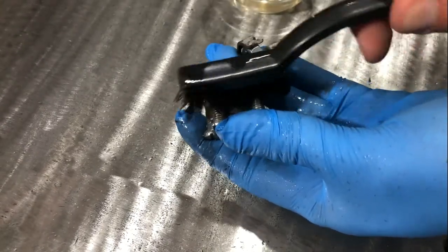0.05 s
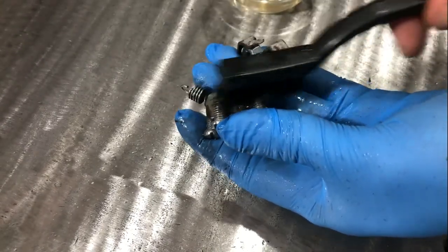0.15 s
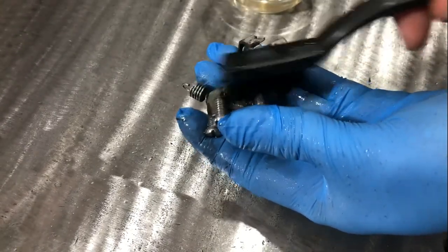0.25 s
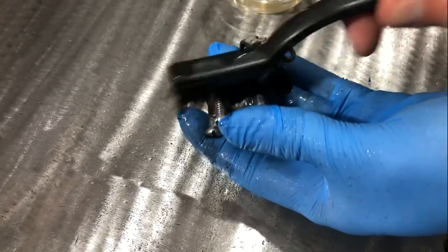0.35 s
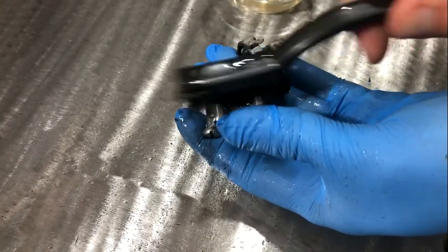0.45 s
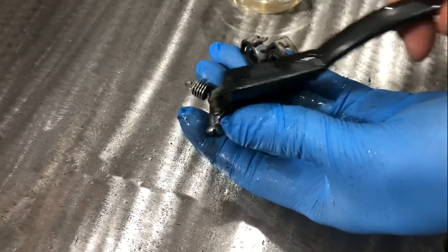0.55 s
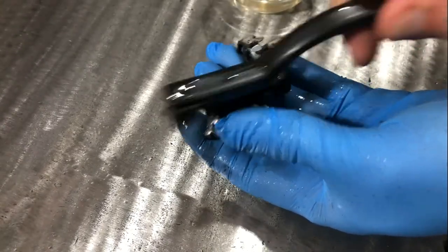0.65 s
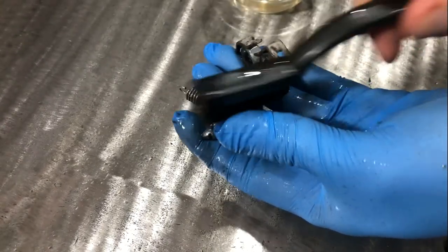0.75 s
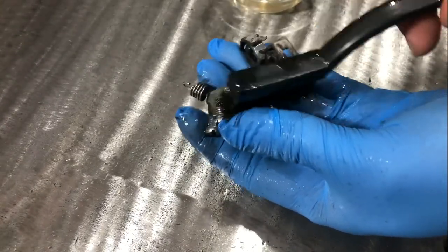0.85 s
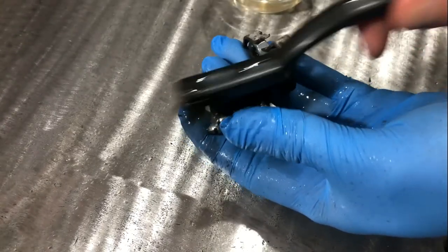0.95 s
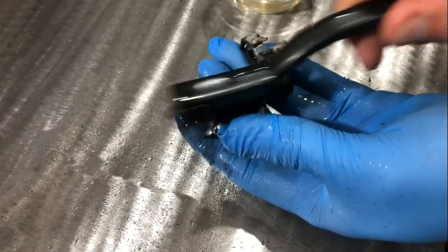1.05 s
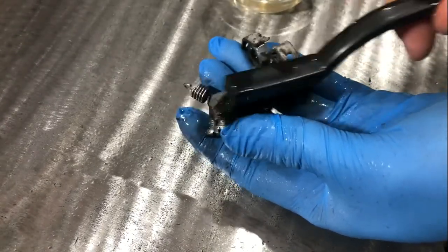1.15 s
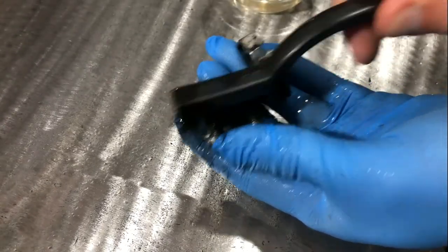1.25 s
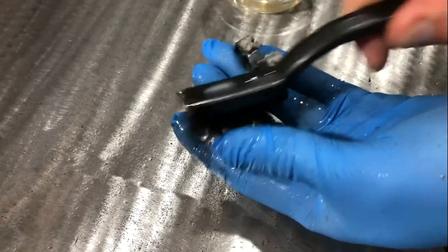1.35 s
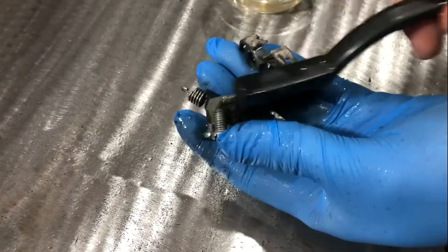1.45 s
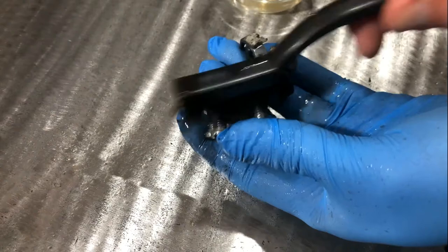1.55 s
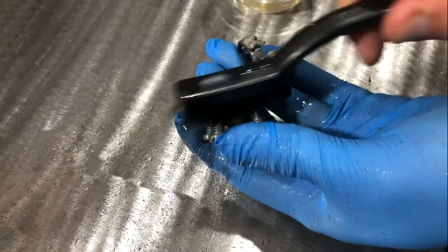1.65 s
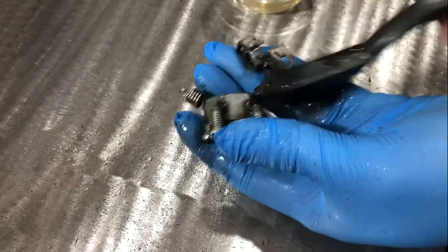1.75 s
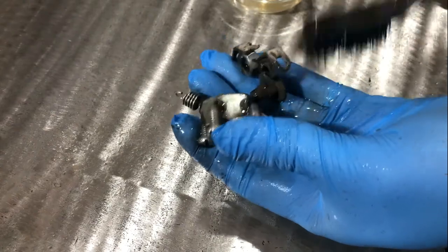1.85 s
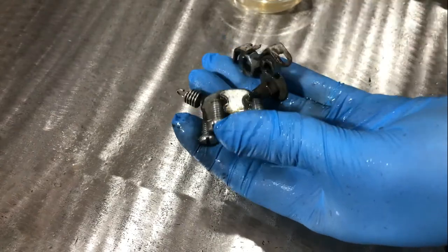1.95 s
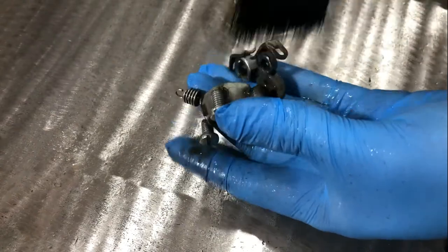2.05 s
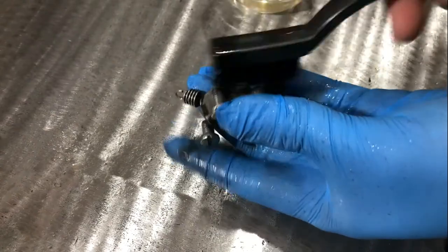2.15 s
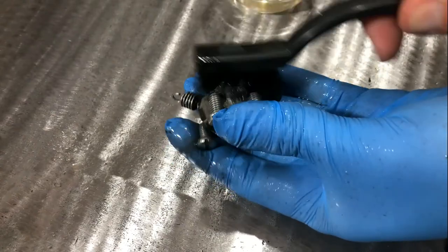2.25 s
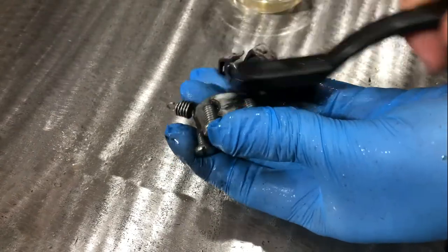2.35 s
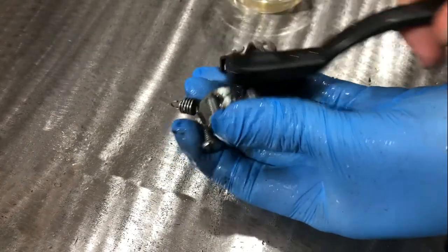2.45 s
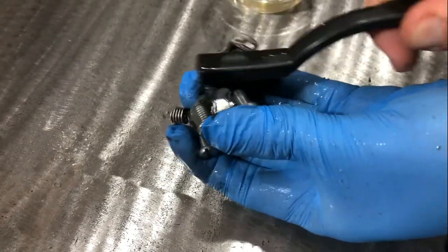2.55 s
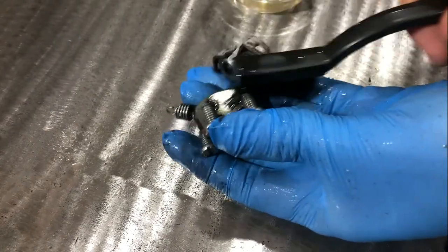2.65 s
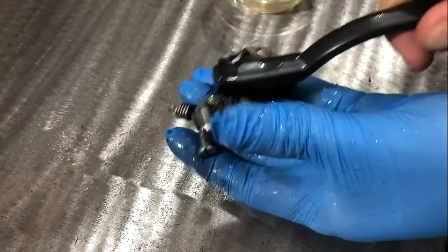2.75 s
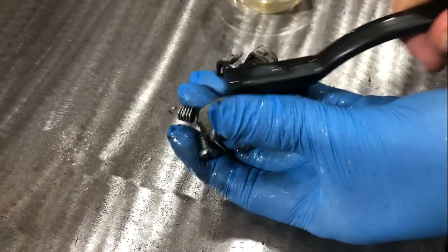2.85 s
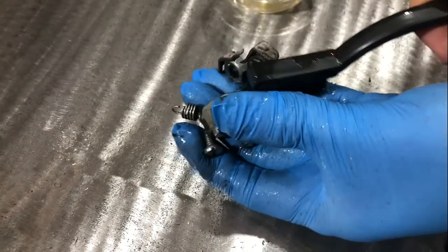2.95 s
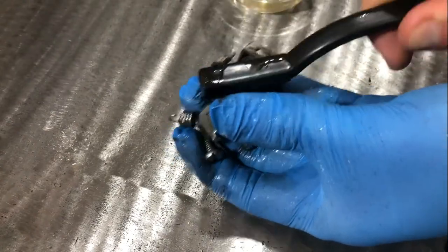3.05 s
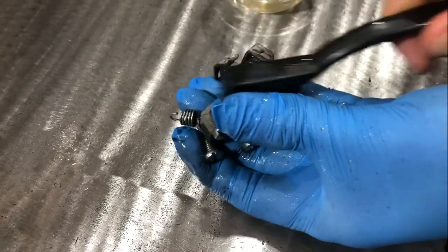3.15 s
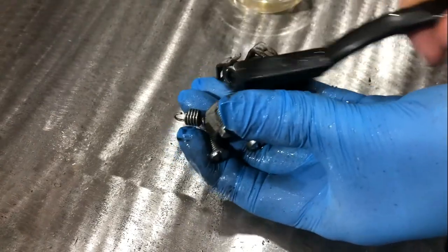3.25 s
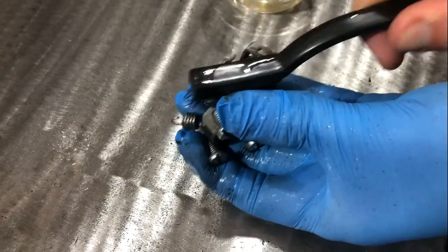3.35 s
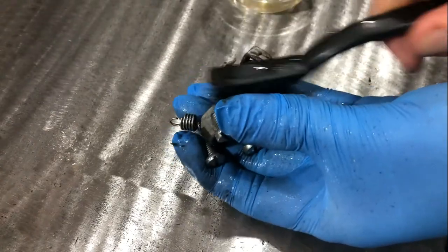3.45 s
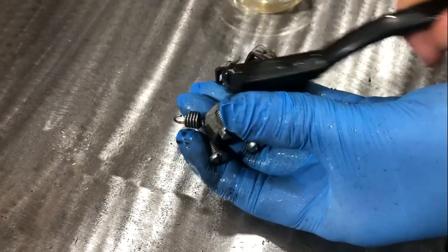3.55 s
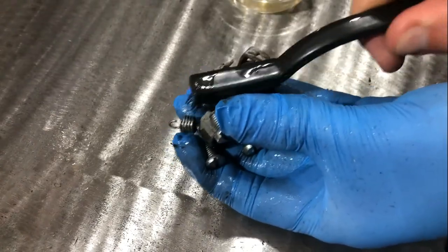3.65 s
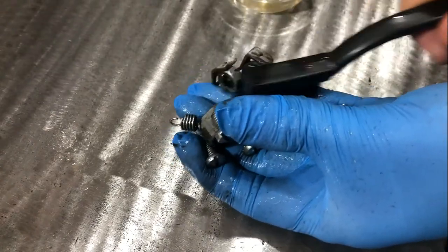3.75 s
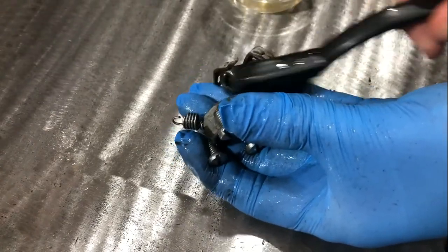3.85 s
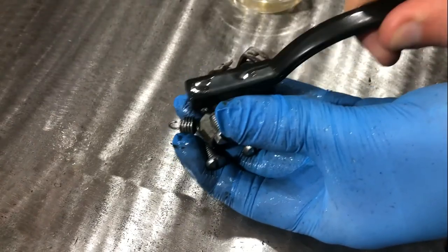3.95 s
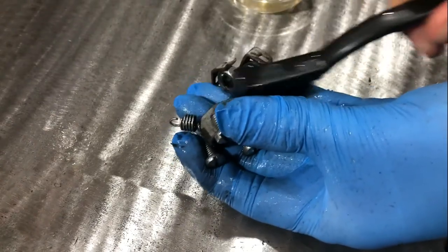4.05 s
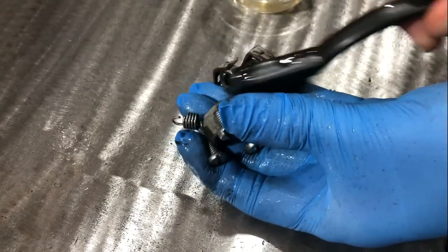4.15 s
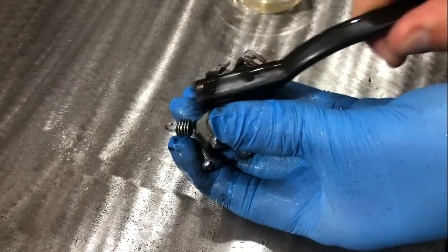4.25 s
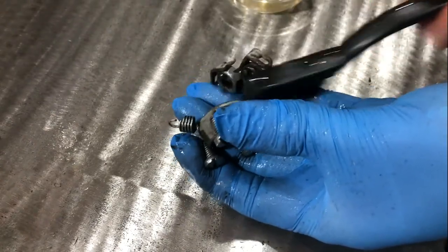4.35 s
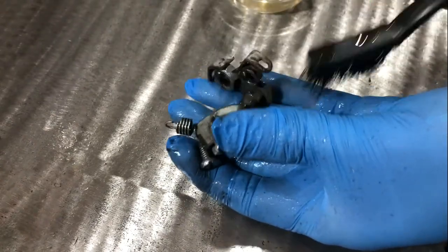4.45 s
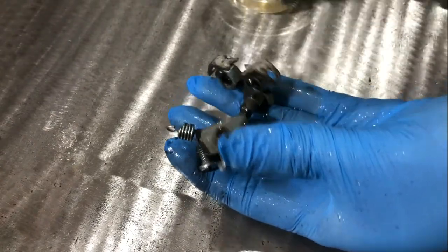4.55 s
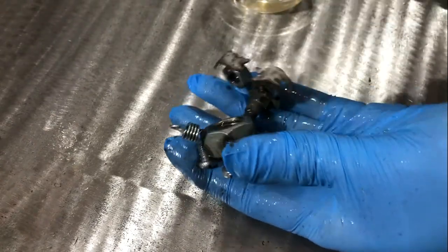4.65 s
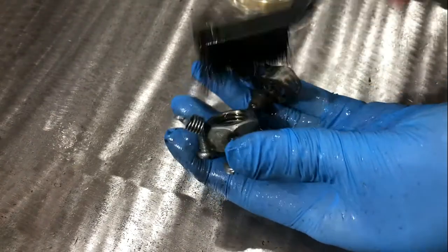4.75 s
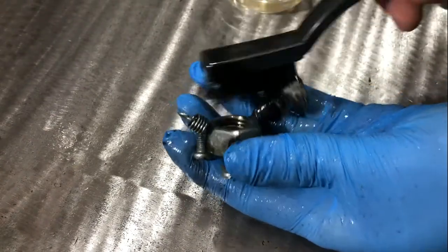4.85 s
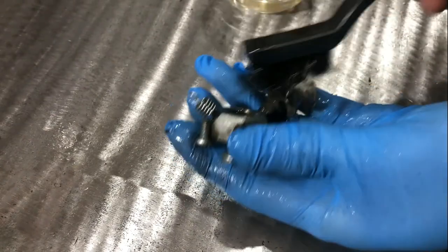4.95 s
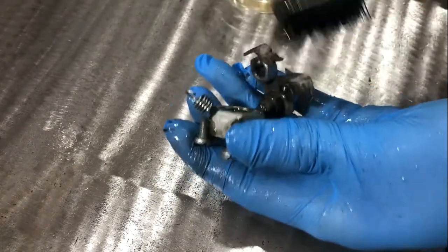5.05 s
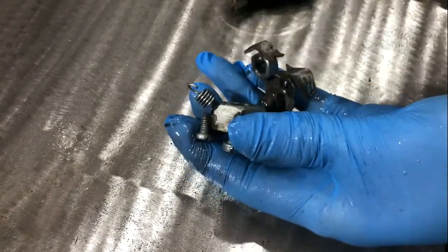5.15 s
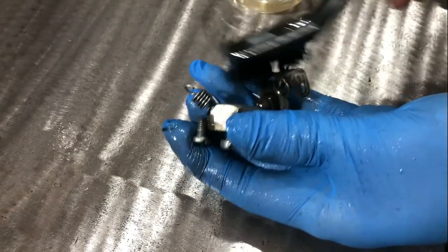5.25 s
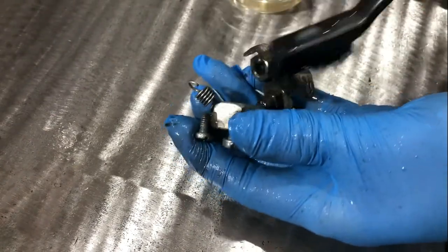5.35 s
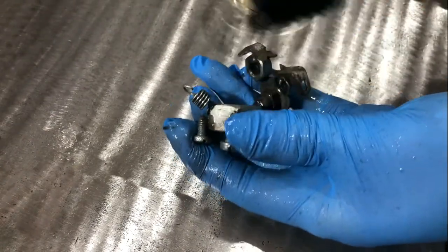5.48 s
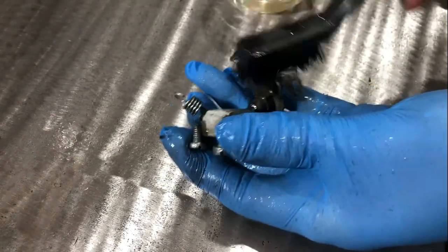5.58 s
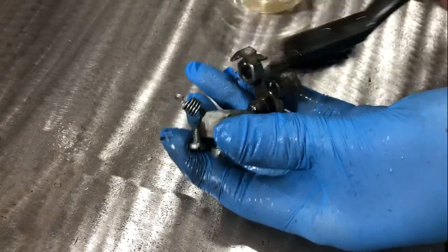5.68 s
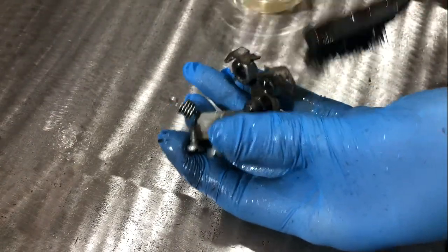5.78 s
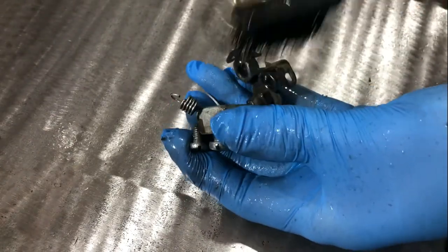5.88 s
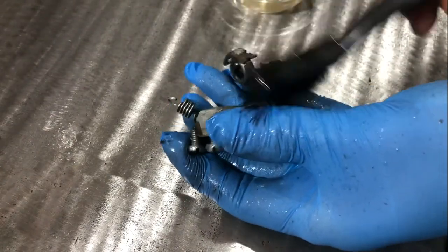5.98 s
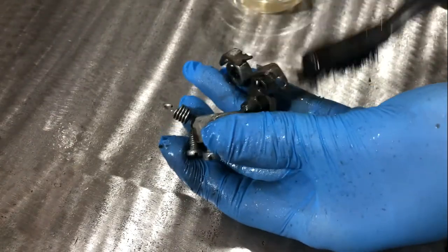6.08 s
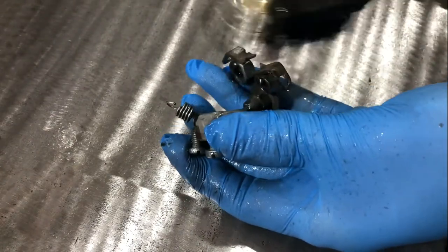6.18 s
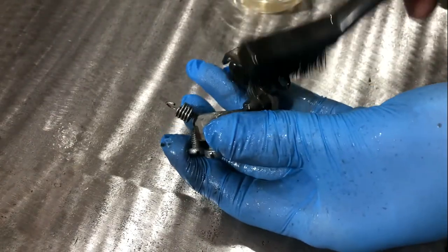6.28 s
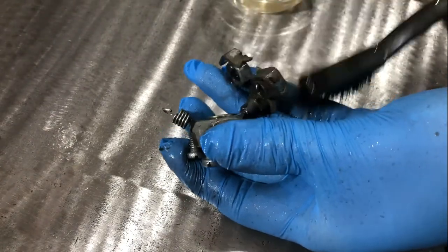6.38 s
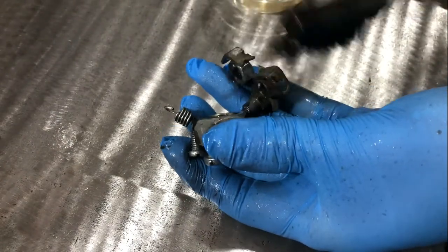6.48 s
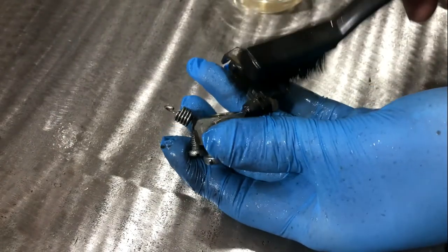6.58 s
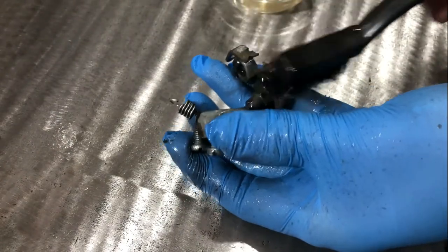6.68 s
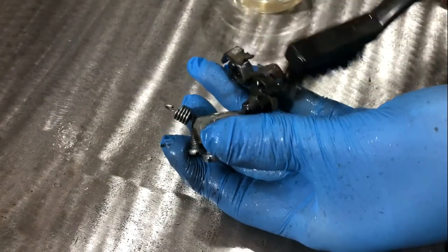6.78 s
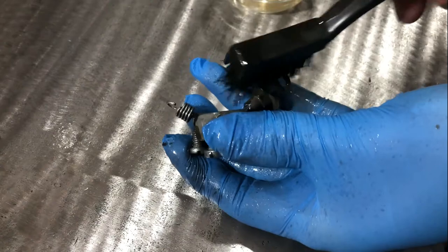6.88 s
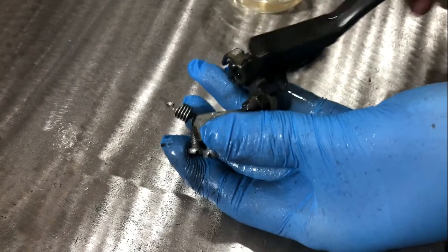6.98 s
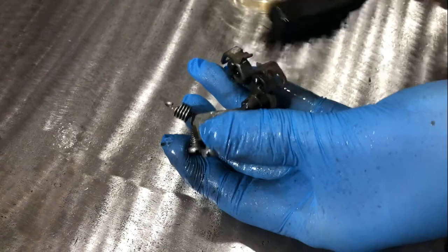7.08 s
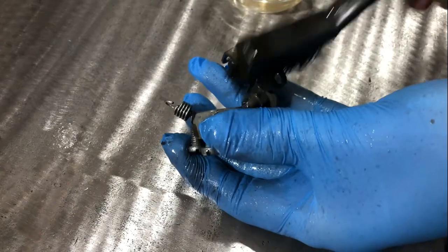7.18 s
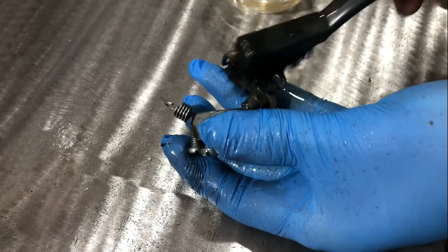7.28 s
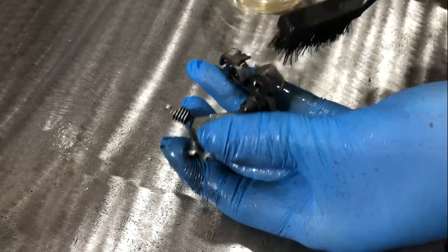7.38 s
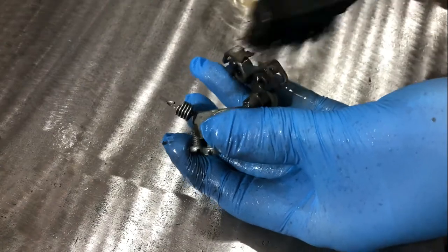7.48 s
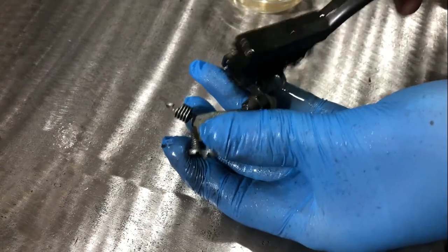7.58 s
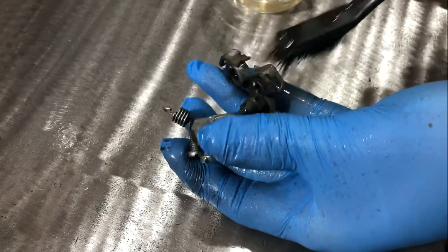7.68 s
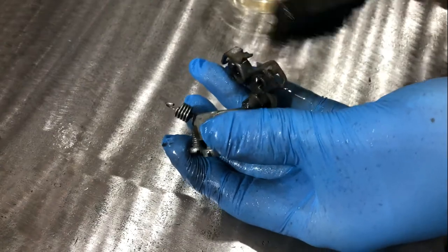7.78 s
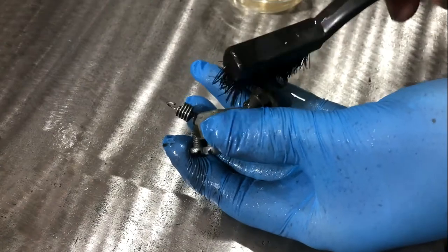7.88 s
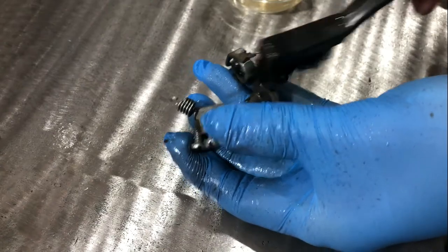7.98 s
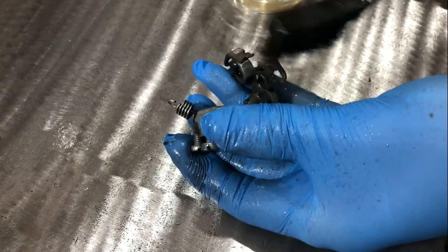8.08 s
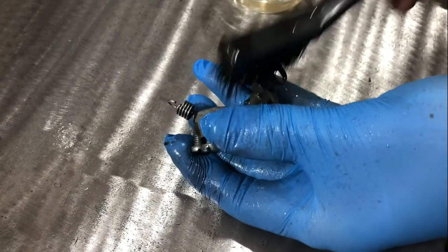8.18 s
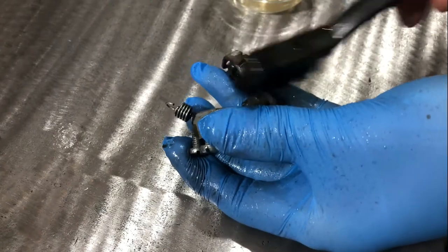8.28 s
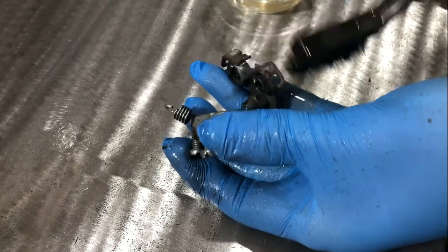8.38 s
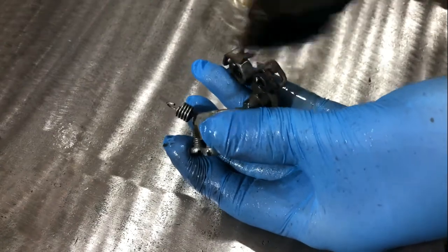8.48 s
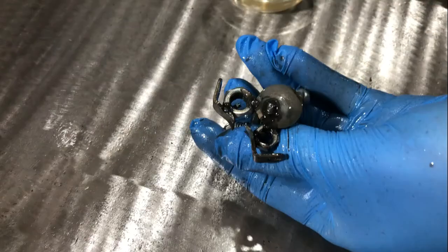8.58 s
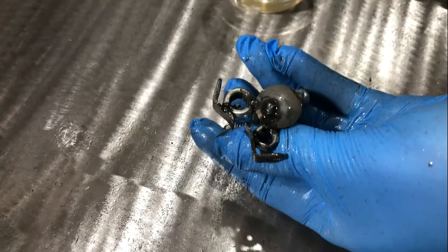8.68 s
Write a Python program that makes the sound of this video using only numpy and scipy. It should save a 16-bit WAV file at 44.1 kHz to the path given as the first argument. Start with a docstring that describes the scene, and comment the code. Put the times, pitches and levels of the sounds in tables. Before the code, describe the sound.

Heard close, with slight room reflection and a faint bed of workshop air and wavering low hums. From 0 to 1.9 s a stiff brush scrubs a small wet metal part in fast, bright, grainy back-and-forth strokes, about six or seven a second, with sharp ticks as tufts snap over edges and a tiny wet squelch near 1.75. A short lull follows. From 2.1 the strokes return softer, with more body and small squelches around 2.4, strengthening from 3.3 to 4.5 on another face. After a pause, single swipes begin near 4.9, 5.3 and 5.7, each landing with a tick. From 6 s short swipes come about three a second, a small spring ringing thinly and high behind them; two hard, quickly damped knocks strike at 6.1 and 6.4. The swipes continue until about 8.5, then everything drops silent for a tenth of a second and the background returns.

```python
"""A stiff brush scrubs a small wet metal part held in a gloved hand over faint workshop air and low hums.
Fast back-and-forth strokes, each a random swarm of bristle flicks, work over three faces of the part.
Among them tufts snap over edges as broad resonant ticks, and the liquid squelches in quick falling chirps.
Single swipes follow, a small spring rings in decaying modes and the brush head knocks twice, quickly damped.
Near the end the sound drops out briefly and returns."""
import sys
import numpy as np
from scipy import signal
from scipy.fft import rfft, irfft
from scipy.io import wavfile
from scipy.ndimage import uniform_filter1d

SR = 44100
rng = np.random.default_rng(int(sys.argv[2]) if len(sys.argv) > 2 else 0)


def put_to_file(sound):
    """Save the sound as 16-bit audio at rate SR, in the file named by the first command-line argument."""
    columns = np.atleast_2d(sound).T  # one column per channel
    safe = np.clip(columns, -1, 1)
    whole_steps = np.round(safe * 32767)
    wavfile.write(sys.argv[1], SR, whole_steps.astype(np.int16))


N = 384552
TIME = np.arange(N) / SR  # s

# spectra of the bristle hiss on each face: [f/Hz, spectrum level/dB]
FRONT = [(530, -38), (900, -31), (1160, -21), (1410, -25.5), (2170, -13.5), (2420, -24), (2830, -10),
         (3190, -16), (3470, -8), (4520, -12.5), (5680, -0.5), (7960, -4.5), (10000, 2), (14500, -6.5),
         (16000, -14)]
TOP = [(530, -37), (900, -18), (1230, -9), (1490, -11.5), (2220, -5.5), (2630, -19), (2860, -6.5),
       (4520, -5), (5350, -0.5), (8350, 1.5), (9090, -1.5), (12900, 0), (16000, -10)]
BACK = [(880, -47), (1500, -13.5), (2220, -13.5), (2600, -20.5), (3570, -9.5), (4430, -10.5), (5350, -5),
        (6510, -7), (7330, -3), (8330, -0.5), (10800, -5.5), (14500, -6), (15800, -11)]
EDGE = [(880, -31), (1500, -14.5), (2020, -21), (2250, -11), (2760, -7), (3110, -11), (3570, -4.5),
        (4390, -8), (5510, -0.5), (7770, -5), (8330, 2), (9560, -2.5), (11300, 1.5), (14600, -7),
        (15800, -0.5)]
SPRING_SIDE = [(880, -27), (1500, -15.5), (2270, -17), (2660, -13), (3570, -10), (4610, -10), (4990, -5.5),
               (6380, -5), (6910, -11), (8410, -3.5), (9100, -6.5), (11300, -0.5), (13000, -5),
               (15200, -10), (15800, -4)]
# faces in the order they are scrubbed:
# [start t/s, hiss spectrum, hiss offset/dB, body offset/dB, body tilt/dB per octave, body lag t/s]
FACES = [(-.1, FRONT, 0.13, -1.9, 0.4, 0.0046), (2.1, TOP, 0, -2.5, -0.2, 0),
         (3.3, BACK, -0.06, -2.5, 0.4, 0.00085), (4.7, EDGE, 0.6, -0.9, -0.1, 0.0034),
         (5.9, SPRING_SIDE, 1.13, 1, -1.6, 0.0078)]
# the lifted brush lands on the part: [t/s, tick level before the common snap gain/dB,
# level of the fading tip drag before the face's hiss offset/dB]
LANDINGS = [(2.2323, -28, -65), (4.8688, -22.5, -52), (5.303, -17.5, -55), (5.6727, -20, -45.5),
            (6.016, -29, -53), (6.35, -32, -57), (6.675, -21.5, -53), (6.9681, -31, -52.5),
            (7.2976, -27, -53.5), (7.629, -25.5, -59), (7.9688, -27.5, -55), (8.294, -19.5, -48.5)]


def undb(db):
    """Level to amplitude: 20 dB is a factor of ten."""
    return 10 ** (np.asarray(db) / 20)


def unit(x):
    """Normalization to an rms of 1."""
    return x / np.sqrt(np.mean(x ** 2))


def add(out, s, sound):
    """Superposition: a sound is summed into the mix from time s."""
    i = int(s * SR)
    out[i:i + len(sound)] += sound[:N - i]


def convolve(x, response):
    """Linear filtering: convolution with an impulse response."""
    return signal.fftconvolve(x, response)[:len(x)]


def colour(x, points, size=4096):
    """Minimum-phase filtering: folding the cepstrum makes a response to [f/Hz, level/dB] causal."""
    hz, db = np.transpose(points)
    grid = np.maximum(np.arange(size // 2 + 1) * SR / size, 1)
    level = np.interp(np.log(grid), np.log(hz), db)
    cepstrum = irfft(np.log(undb(level)))
    cepstrum[1:size // 2] *= 2
    cepstrum[size // 2 + 1:] = 0
    return convolve(x, irfft(np.exp(rfft(cepstrum))))


def walk(rate):
    """Band-limited fluctuation: random steps, rate per second, are smoothed and scaled to rms 1."""
    k = max(int(SR / rate), 1)
    steps = np.repeat(rng.standard_normal(N // k + 1), k)
    return unit(uniform_filter1d(steps, k)[:N])


def decay(t, t60):
    """Exponential damping: the amplitude falls by 60 dB in t60 seconds."""
    return np.exp(-np.log(1000) * t / t60)


def burst(t60):
    """Damped random vibration: exponentially decaying noise of unit energy."""
    t = np.arange(int(t60 * SR) + 2) / SR
    noise = rng.standard_normal(len(t)) * decay(t, t60)
    return noise / np.linalg.norm(noise)


def ring(modes):
    """Modal superposition: an impulse response is a sum of damped sines [f/Hz, level/dB, t60/s]."""
    t = TIME[:SR // 2]
    response = 0
    for k, (hz, db, t60) in enumerate(modes):
        sign = (-1) ** k
        response = response + sign * undb(db) * np.sin(2 * np.pi * hz * t) * decay(t, t60)
    return response


def workshop():
    """Background: filtered noise plus hums, with wandering levels and hum frequencies."""
    # spectrum of the air noise: [f/Hz, spectrum level/dB]
    air_colour = [(20, -21.5), (45, -5), (70, 2), (110, -1.5), (180, -4), (450, -8.5), (1100, -11.5),
                  (1500, -11.5), (2600, -20.5), (4800, -17.5), (6000, -23), (11000, -23.5), (16000, -30)]
    # low hums that come and go: [f/Hz, mean level/dB, start t/s, end t/s]
    hums = [(47.4, -79, 0, 8.7), (45.8, -73, 2.5, 8.5), (149.3, -71, -0.4, .35), (141, -75.5, 1.7, 3.9),
            (234, -69.5, 5.5, 6.05), (88.2, -69.5, 6, 7.0), (142, -72, 6, 6.6)]
    mean_air_db = -64
    out = unit(colour(rng.standard_normal(N), air_colour)) * undb(mean_air_db + 1.6 * walk(17))
    for hz, db, start, end in hums:
        fade = np.clip(np.minimum(TIME - start, end - TIME) / 0.073, 0, 1)
        phase = 2 * np.pi * np.cumsum(hz + 3 * walk(30)) / SR
        out = out + np.sqrt(2) * np.sin(phase) * fade * undb(db + 2.5 * walk(15))
    return out


def face_at(s):
    """Contact sequence: the index of the face under the brush at time s."""
    return sum(s >= face[0] for face in FACES[1:])


def arch(length, fastest, depth_db):
    """Stroke kinematics: gain peaks where the hand is fastest and falls towards each reversal."""
    power, bite_s, settle_s = 1.774, .0072, .012
    t = TIME[:SR // 3]
    away = np.interp(t, [0, np.clip(fastest, .05, .95) * length, length], [-1, 0, 1])
    speed_gain = undb(-depth_db * np.abs(away) ** power)
    # the bristles take hold, and come to rest
    bite = np.minimum(t / bite_s, 1)
    settle = np.exp(-np.maximum(t - length, 0) / settle_s)
    return speed_gain * bite * settle


def hand():
    """Friction drive: each stroke gives hiss and body an arch, each landing a decaying drag."""
    # brush strokes: [start t/s, length t/s, fastest moment as a fraction 0-1,
    # hiss level before the face's offset/dB, body level relative to the hiss before its offset/dB]
    strokes = [(-0.03, 0.18, 0.61, -35, -34), (0.163, 0.15, 0.56, -31.0, -20.5),
               (0.324, 0.16, 0.6, -31.0, -27), (0.496, 0.13, 0.71, -31, -19), (0.634, 0.15, 0.67, -34, -18),
               (0.799, 0.15, 0.68, -32, -21), (0.957, 0.16, 0.63, -31.5, -17),
               (1.142, 0.12, 0.44, -29.5, -18), (1.268, 0.14, 0.49, -33.5, -17.5),
               (1.41, 0.14, 0.77, -32, -18.0), (1.566, 0.13, 0.64, -31, -20.5),
               (1.712, 0.17, 0.73, -29.5, -16), (2.12, 0.15, 0.5, -61.5, -2), (2.227, 0.16, 0.34, -47, -11),
               (2.319, 0.17, 0.7, -40, -14.5), (2.487, 0.15, 0.42, -43.5, -12),
               (2.63, 0.15, 0.72, -46, -13.5), (2.785, 0.13, 0.4, -47, -13), (2.87, 0.16, 0.86, -44.5, -15),
               (3.039, 0.12, 0.85, -38.5, -15.5), (3.19, 0.13, 0.6, -40.0, -18),
               (3.333, 0.12, 0.84, -34.5, -17), (3.482, 0.14, 0.54, -37, -14.5),
               (3.629, 0.12, 0.63, -35.5, -17), (3.755, 0.14, 0.78, -38, -14.5),
               (3.894, 0.16, 0.67, -37, -17.5), (4.061, 0.15, 0.62, -36.5, -13),
               (4.216, 0.12, 0.64, -37, -16.0), (4.342, 0.17, 0.63, -34, -12.5),
               (4.864, 0.058, 0.1, -46.5, -13), (4.946, 0.19, 0.54, -34.0, -18.5),
               (5.312, 0.21, 0.38, -35.5, -16.5), (5.668, 0.14, 0.89, -36.5, -15.0),
               (6.012, 0.15, 0.5, -36.5, -15.5), (6.362, 0.11, 0.55, -36.5, -15),
               (6.688, 0.047, 0.34, -36.5, -18), (6.731, 0.14, 0.29, -35.5, -17.5),
               (6.872, 0.038, 0.3, -50, -16.0), (7.019, 0.12, 0.62, -34.5, -15.5),
               (7.333, 0.105, 0.62, -34, -15.5), (7.676, 0.094, 0.51, -34.5, -15),
               (8.002, 0.16, 0.53, -35.5, -21), (8.331, 0.13, 0.54, -34, -17.5)]
    hiss_arch_db, body_arch_db = 19.5, 17  # depth below the peak at the reversals
    drag_s = .06  # decay time to 1/e
    hiss, body = np.zeros((2, len(FACES), N))
    for s, length, fastest, db, body_db in strokes:
        face = face_at(s)
        past = max(int(-s * SR), 0)  # samples of the stroke that lie before time 0
        hiss_arch = undb(db) * arch(length, fastest, hiss_arch_db)
        body_arch = undb(db + body_db) * arch(length, fastest, body_arch_db)
        add(hiss[face], max(s, 0), hiss_arch[past:])
        add(body[face], max(s + FACES[face][-1], 0), body_arch[past:])
    for s, _, drag_db in LANDINGS:
        add(hiss[face_at(s)], s, undb(drag_db) * np.exp(-TIME[:SR // 3] / drag_s))
    return hiss, body


def tonal_grains(low_hz, high_hz, t60, count):
    """Tonal grain: sparse short decaying sines at random times, frequencies and sizes."""
    out, t = np.zeros(N), TIME[:SR // 20]
    for when, pitch, size in rng.random((count, 3)):
        hz = low_hz + (high_hz - low_hz) * pitch
        add(out, when * TIME[-1], size * np.sin(2 * np.pi * hz * t) * decay(t, t60))
    return unit(out)


def flicks(rate, tufts, scatter_db, t60, count=24):
    """Stick-slip as shot noise: random slips excite short rings of several kinds, at an even mean level."""
    size = undb(scatter_db * np.clip(rng.standard_normal(N), -2, 2)) * rng.choice([-1, 1], N)
    slips = (rng.random(N) < rate / SR) * size * tufts
    kind = rng.integers(0, count, N)
    swarm = sum(signal.oaconvolve(slips * (kind == k), burst(t60))[:N] for k in range(count))
    power = uniform_filter1d(swarm ** 2, size=900)
    return swarm / np.sqrt(np.maximum(power, 0) + np.mean(power) / 1000)


def brush(gains, body_gains):
    """Friction-excited vibration: tips hiss in each face's colour and roots shake the brush body."""
    # spectrum of the brush head and held part before the face's tilt: [f/Hz, spectrum level/dB]
    body_colour = [(50, -27), (120, -5), (250, -3.5), (500, -1), (900, 0), (1400, -0.5), (2100, -4.5),
                   (3000, 0), (5000, -33.5)]
    effort = gains.sum(axis=0)
    # a harder stroke frees more bristles a second, and neighbours let go together in tufts
    rate = 1100 + 9000 * effort / effort.max()
    tufts = undb(1.6 * np.clip(walk(380), -2, 2))
    tonal_treble = undb(-6.5) * tonal_grains(low_hz=1000, high_hz=15000, t60=.05, count=2600)
    tonal_body = undb(-10) * tonal_grains(low_hz=300, high_hz=3000, t60=.02, count=1200)
    tips = flicks(rate, tufts, scatter_db=7.0, t60=0.0018) + tonal_treble
    roots = flicks(rate / 2, tufts, scatter_db=4.0, t60=0.0042) + tonal_body
    # the pressure varies as the bristles ride over the uneven part
    bumps = undb(0.75 * walk(70))
    hisses, body = [], 0
    for face, gain, body_gain in zip(FACES, gains, body_gains):
        _, spectrum, hiss_db, body_db, tilt_db, _ = face
        hisses.append(unit(colour(tips, spectrum)) * gain * bumps * undb(hiss_db))
        # the grip changes with the face, and with it the depth of the body
        held = [(hz, db + tilt_db * np.log2(hz)) for hz, db in body_colour]
        body = body + unit(colour(roots, held)) * body_gain * bumps * undb(body_db)
    return hisses, body


def room(x, wet_db, t60):
    """Diffuse reverberation: a delayed, decaying noise response stands for the bench and walls."""
    return undb(wet_db) * convolve(x, np.pad(burst(t60), (SR // 250, 0)))


def snaps(events, t60, gain_db, lead_in_db):
    """Impulsive resonance: a resonant tick amid stragglers, after a short swelling noise lead-in."""
    out, lead = np.zeros(N), SR // 200
    for s, db, hz in events:
        lead_in = undb(lead_in_db) * rng.standard_normal(lead) * np.linspace(0, 1, lead) ** 2
        stragglers = undb(-7) * burst(0.066)
        crack = np.concatenate([lead_in, stragglers, np.zeros(SR // 200)])
        leader = burst(t60)[:len(crack) // 2]
        release = lead + SR // 1000
        crack[release:release + len(leader)] += leader
        resonance = [(200, -22), (1500, -15), (hz * 0.43, -9), (min(hz, 13000), 0),
                     (15000, -6), (18000, -24)]
        tick = colour(crack, resonance, size=512)
        add(out, max(s - lead / SR, 0), tick * undb(db + gain_db) / np.linalg.norm(tick))
    return out


def strays(effort, count=130):
    """Random contact events: further snaps grow with stroke effort; rows [t/s, level/dB, f/Hz]."""
    level_db, scatter_db = -20.5, 6.5  # at the hardest moment, before the common snap gain
    follow = 0.62  # dB of snap per dB of hiss
    touch_db = -56  # below this hiss gain the brush is off the part
    low_hz, high_hz = 7000, 13000
    rows, hiss_db = [], 20 * np.log10(effort + 1e-9)
    hardest_db = hiss_db.max()
    for when, size, pitch in rng.random((count, 3)):
        i = int(when * N)
        db = level_db + follow * (hiss_db[i] - hardest_db) + scatter_db * (2 * size - 1)
        lifted_db = 2 * min(hiss_db[i] - touch_db, 0)
        rows.append((TIME[i], db + lifted_db, low_hz + (high_hz - low_hz) * pitch))
    return rows


def squelches(start_hz, end_hz, length):
    """Liquid film rupture: the parting film gives a short chirp of falling frequency."""
    # wet squelches: [t/s, envelope peak level/dB]
    film_breaks = [(1.758, -34), (1.763, -49), (2.378, -32.5), (2.431, -44), (3.352, -38), (4.218, -46)]
    out, t = np.zeros(N), TIME[:SR // 50]
    hz = end_hz + (start_hz - end_hz) * np.exp(-t / length)
    envelope = t / length * np.exp(1 - t / length)
    chirp = np.sin(2 * np.pi * np.cumsum(hz) / SR) * envelope
    for s, db in film_breaks:
        add(out, s, chirp * undb(db))
    return out


def spring(rubbing):
    """Forced and free vibration: rubbing drives the spring's modes; landings and releases excite them."""
    # the spring let go by the bristles: [t/s, impulse level/dB]
    plucks = [(6.121, -37), (6.443, -38), (6.829, -48), (6.885, -48), (7.39, -44), (7.735, -49),
              (8.443, -44)]
    # modes of the spring: [f/Hz, level/dB, t60/s]
    spring_modes = [(3230, -30, .3), (4980, 0, .24), (6158, -24, .26), (8720, -13, .1), (10270, -19, .3),
                    (10520, -14, .18), (11180, -10, .17), (12600, -19, .22), (13590, -13, .1)]
    landing_pluck_db = -33  # impulse relative to the landing's tick level in the table
    push = rubbing.copy()
    landed = [(s, db + landing_pluck_db) for s, db, _ in LANDINGS if s > FACES[-1][0]]
    for s, db in plucks + landed:
        add(push, s, undb([db]))
    return convolve(push, ring(spring_modes))


def knocks(rattle_db, rattle_t60):
    """Impact excitation: the plastic head strikes modes of the part that the fingers damp at once."""
    # the brush head knocking on the part: [t/s, direct peak level/dB]
    blows = [(6.105, -16), (6.4327, -11.5)]
    # modes of a knock: [f/Hz, level/dB, t60/s]
    knock_modes = [(800, -13, .009), (1250, -7, .008), (1800, -3, .006), (2500, 0, .007), (3310, -1, .011),
                   (3850, -6, .005), (7730, -6, .009), (8680, -3, .009), (11100, -8, .011)]
    out = np.zeros(N)
    for s, db in blows:
        blow = undb(rattle_db) * burst(rattle_t60)
        blow[0] += 1
        knock = convolve(ring(knock_modes), blow)
        add(out, s, knock * undb(db) / np.abs(knock).max())
    return out


def scene():
    """Superposition: direct sounds at the hand, their reverberant tail and the background."""
    # tufts snapping over an edge at set times, loud and faint:
    # [t/s, level before the common snap gain/dB, centre f/Hz]
    edge_snaps = [(0.1154, -17, 11000), (0.1935, -22, 6100), (0.2374, -17, 9710), (0.4718, -12, 11200),
                  (0.6134, -24, 9860), (0.7404, -13, 11500), (1.0894, -15.5, 10500), (1.1543, -15, 9640),
                  (1.28, -18.5, 6200), (1.3673, -14, 11500), (1.48, -9.5, 10600), (1.7529, -12, 6180),
                  (1.8053, -12, 10500), (2.3146, -20.5, 9660), (2.4518, -14.5, 8640),
                  (2.6234, -21.5, 11600), (2.7127, -24, 12200), (2.7561, -25, 11600), (2.8399, -19.5, 7060),
                  (3.0096, -28, 8280), (3.1732, -22.5, 6300), (3.2271, -17, 7640), (3.3288, -21.5, 9280),
                  (3.4047, -12.5, 8870), (3.5219, -16.5, 8830), (3.7034, -15.5, 7540), (3.7863, -25, 13400),
                  (3.7978, -19, 9530), (3.9315, -16.5, 9040), (4.888, -30, 12300), (4.9711, -21.5, 14900),
                  (5.4026, -14, 8190), (5.69, -19, 12200), (5.7914, -24, 12400), (6.0965, -13.5, 3130),
                  (6.3859, -14.5, 5010), (6.6972, -19, 10800), (6.7855, -13, 10900), (7.0449, -21, 10900),
                  (7.3731, -22, 13200), (8.0037, -21.5, 11300), (8.4417, -17.5, 12500), (8.5185, -30, 8000)]
    landing_hz = 5500
    gains, body_gains = hand()
    hisses, body = brush(gains, body_gains)
    touches = [(s, db, landing_hz) for s, db, _ in LANDINGS]
    stray_snaps = strays(gains.sum(axis=0))
    ticks = snaps(edge_snaps + touches + stray_snaps, t60=.0035, gain_db=4.5, lead_in_db=-31)
    # the spring is driven by the hiss of the last two faces, a little more by the last
    singing = spring(undb(-57) * hisses[-1] + undb(-59) * hisses[-2])
    blows = knocks(rattle_db=-1.5, rattle_t60=0.0063)
    wet_film = squelches(start_hz=2300, end_hz=430, length=0.00093)
    scrubbing = sum(hisses) + body + ticks + wet_film
    # the knocks feed the tail 3 dB more strongly than the other sounds
    tail = room(scrubbing + singing + undb(3) * blows, wet_db=-16.5, t60=0.28)
    return (scrubbing + singing + blows + tail + workshop())[None]


def record(dry):
    """Gating and band limiting: the sound drops out briefly near the end; a steep low-pass cuts the top."""
    gap_start_s, gap_end_s, top_hz = 8.57, 8.675, 15850
    live = uniform_filter1d(1. * ((TIME < gap_start_s) | (TIME > gap_end_s)), size=200)
    low_pass = signal.ellip(12, .1, 80, top_hz, fs=SR, output="sos")
    return signal.sosfilt(low_pass, dry * live)


dry = scene()
out = record(dry)
put_to_file(out)
```